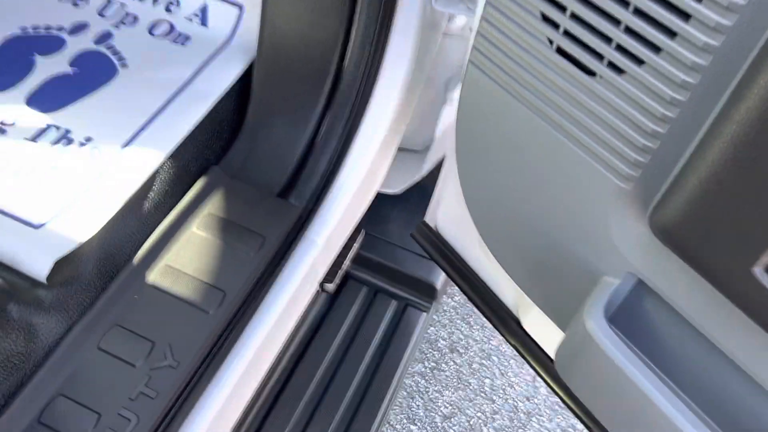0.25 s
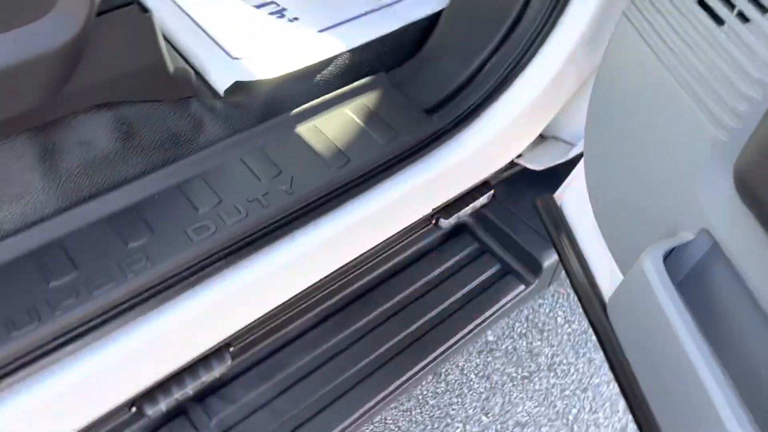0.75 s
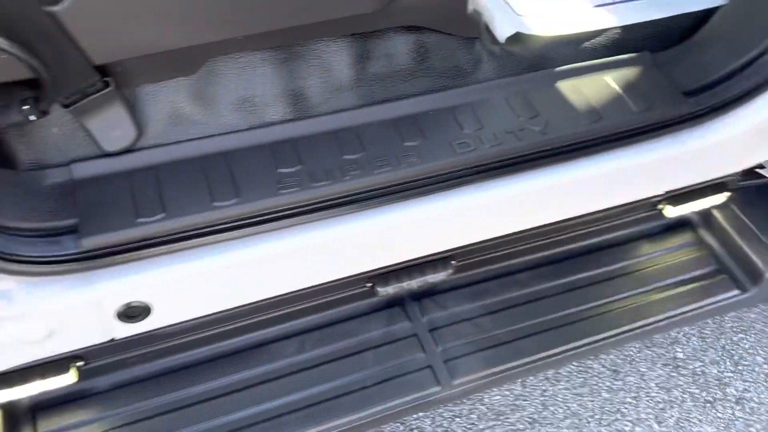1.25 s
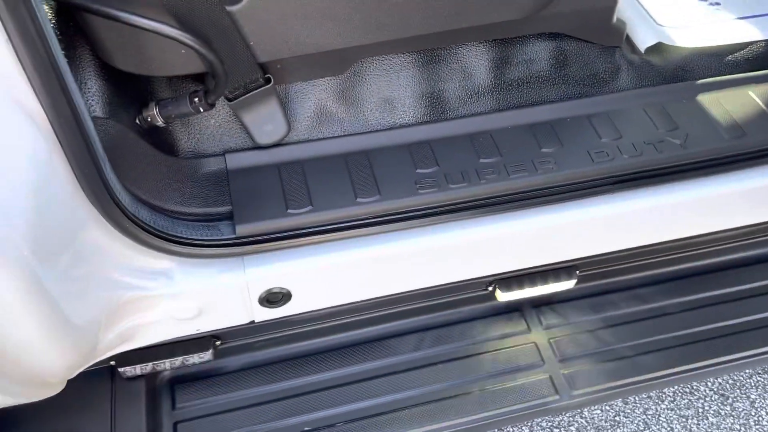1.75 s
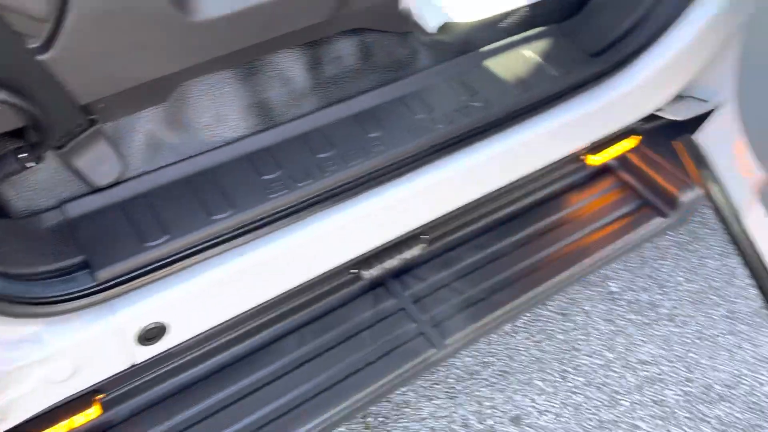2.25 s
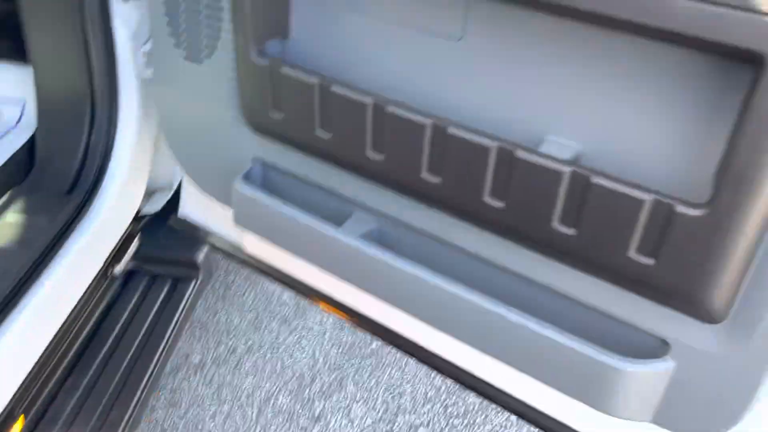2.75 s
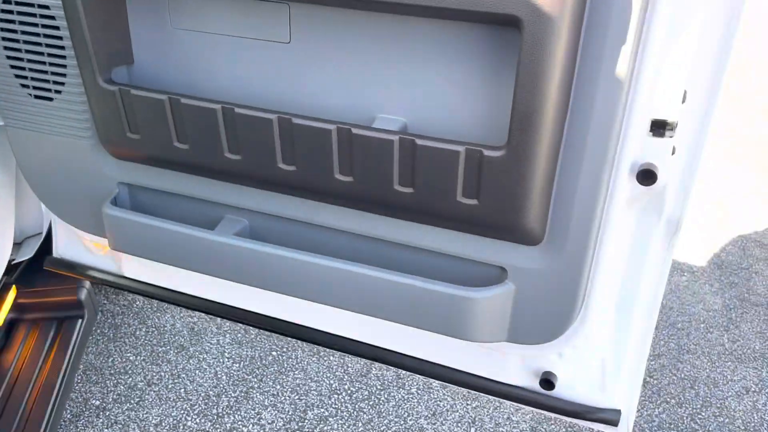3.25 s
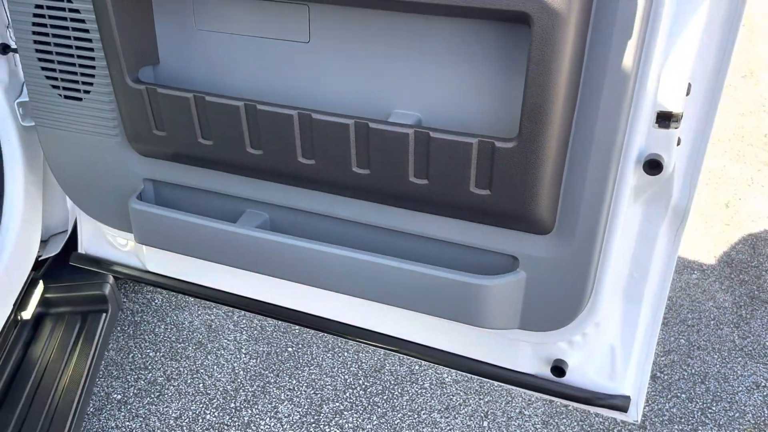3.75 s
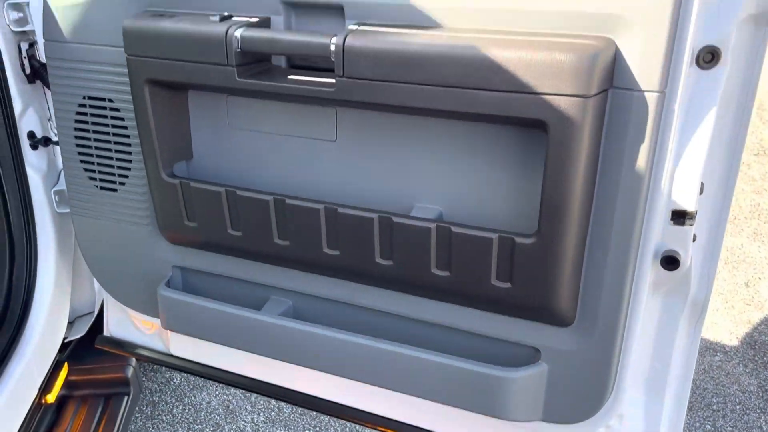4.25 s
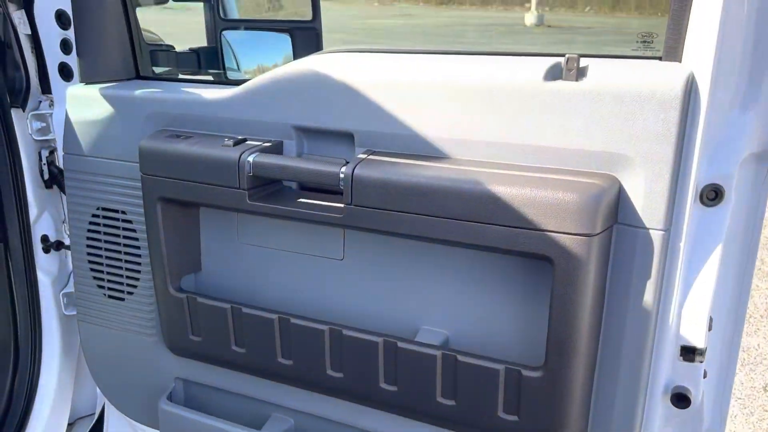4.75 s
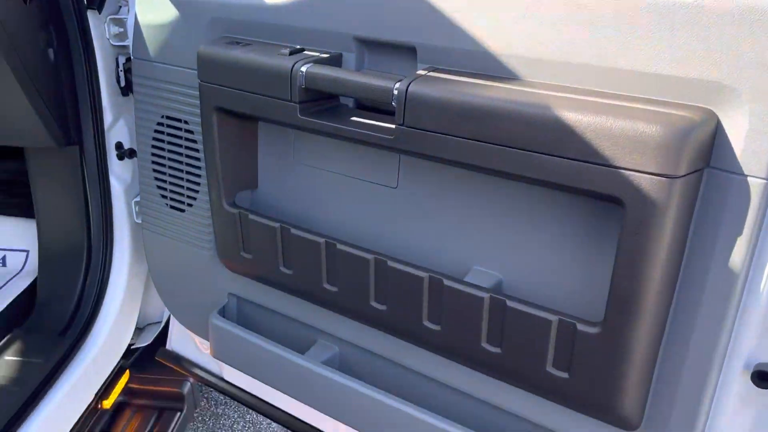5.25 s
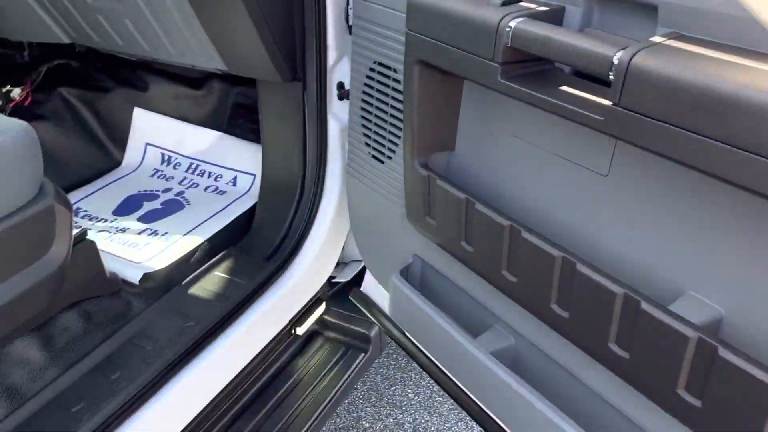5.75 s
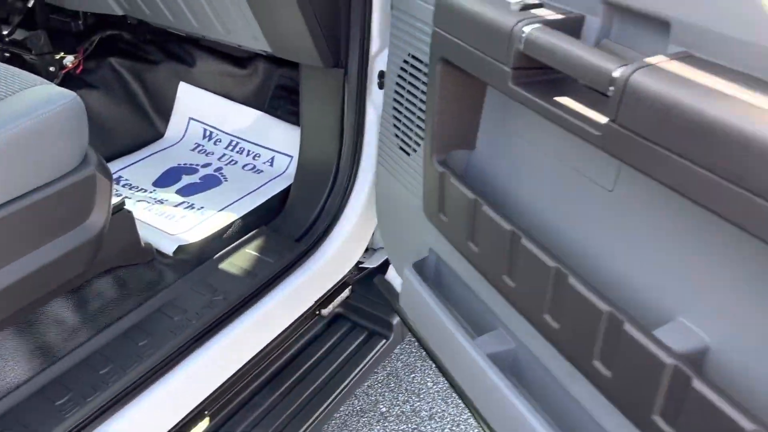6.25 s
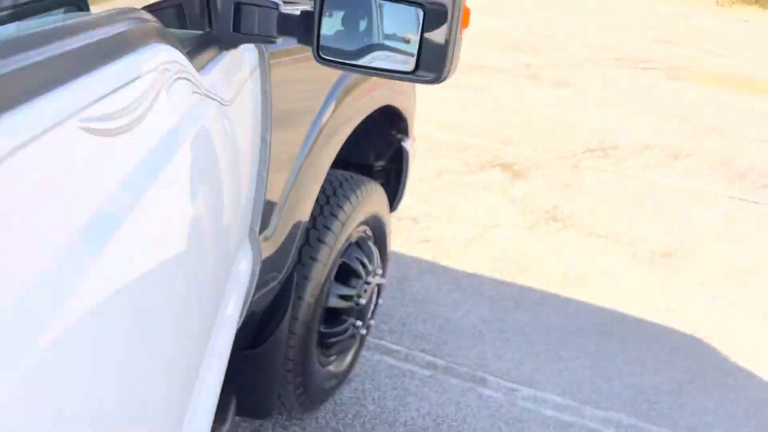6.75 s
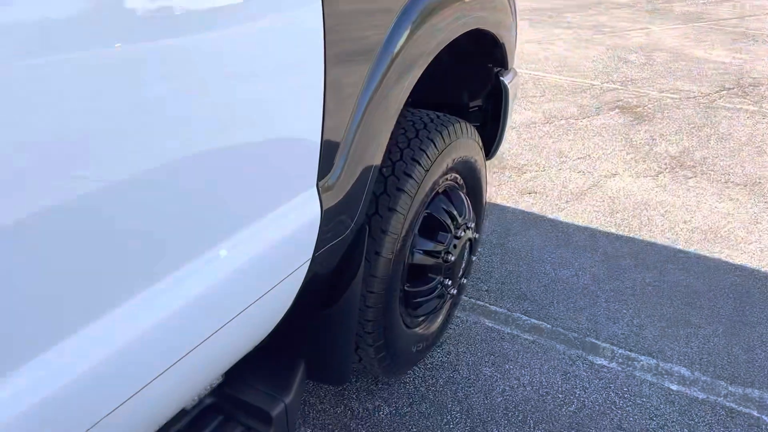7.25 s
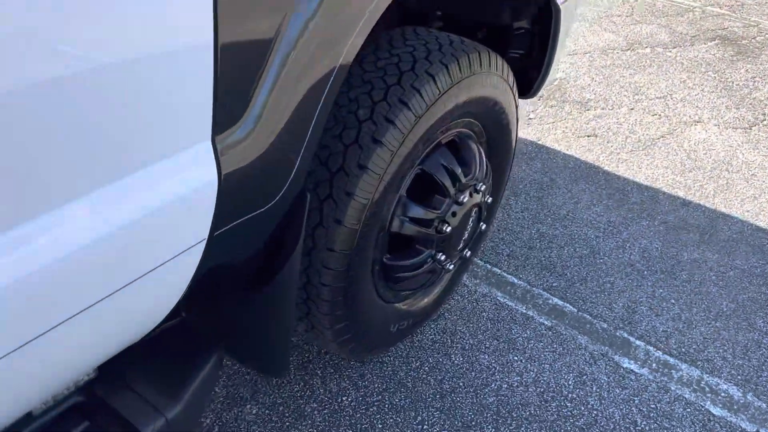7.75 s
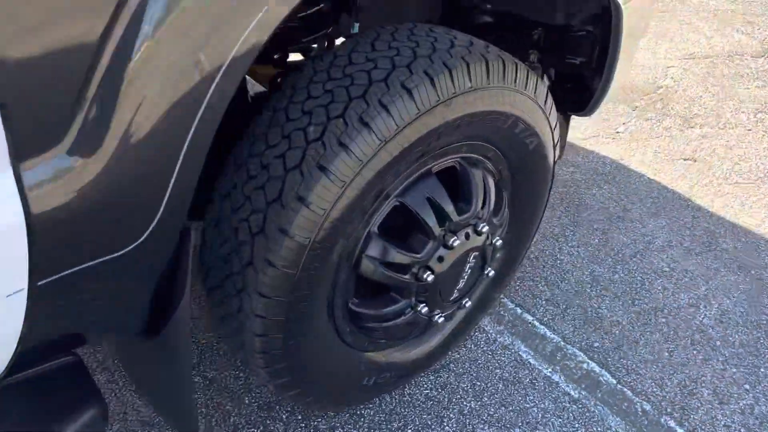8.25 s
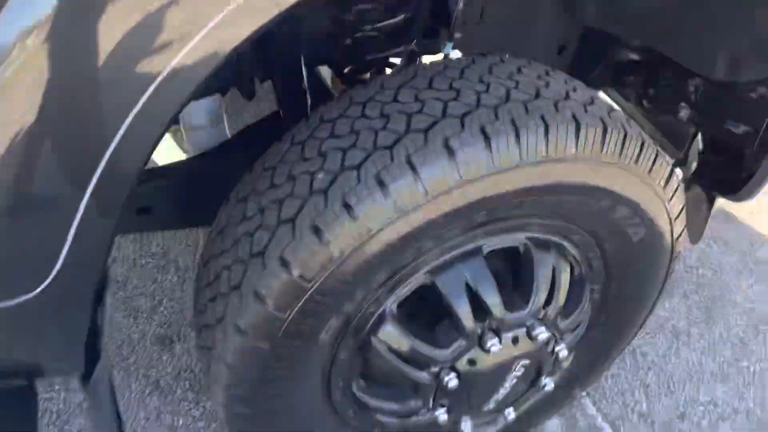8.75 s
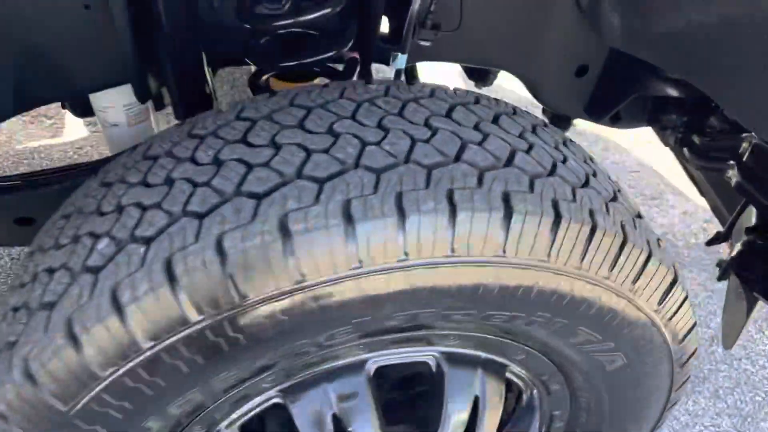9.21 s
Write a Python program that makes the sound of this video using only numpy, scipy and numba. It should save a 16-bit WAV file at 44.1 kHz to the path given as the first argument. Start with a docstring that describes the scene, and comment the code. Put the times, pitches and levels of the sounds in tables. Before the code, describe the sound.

Outdoors, a moving phone microphone picks up the even, ticking rattle of an idling diesel truck, with low wind rumble and the hum of a faraway lorry. After a brief gritty shoe scuff and a faint swish of cloth, gusts thump against the microphone. The cab door slams once, the sharpest sound, and the clatter and a faint gear whine grow as the microphone nears the front wheel.

```python
"""On an open lot a V8 diesel truck idles while a hand-held phone moves from the cab door to the front wheel.
Each firing rattles the engine block, fuel injectors tick, and gears and pumps whine. Wind rumbles and
pops on the microphone. Far off, a lorry hums through its exhaust as it pulls away and changes gear.
A shoe scuffs grit, cloth brushes once, and at 7 s the cab door is swung shut and its panel rings."""
import sys
import numpy as np
from scipy import signal
from scipy.fft import rfft, irfft
from scipy.io import wavfile
from scipy.ndimage import uniform_filter1d
from numba import njit

SR = 44100
rng = np.random.default_rng(int(sys.argv[2]) if len(sys.argv) > 2 else 0)


def file_out(sig):
    """Save sig as 16-bit WAV at sys.argv[1]."""
    # one column per channel
    cols = np.atleast_2d(sig).T
    # limit, then scale
    lim = np.clip(cols, -1, 1)
    pcm = np.round(lim * 32767).astype(np.int16)
    wavfile.write(sys.argv[1], SR, pcm)


N = 418068
T = np.arange(N) / SR
F = np.fft.rfftfreq(N, 1 / SR) + 1e-3
SIDES = np.array([[1], [-1]])  # plus on the left, minus on the right
CYCLE_HZ, CYLINDERS = 5.005, 8  # every cylinder of the truck fires once per cycle


def undb(db):
    """Turn decibels into a number to multiply by."""
    return 10 ** (np.asarray(db) / 20)


def curves(table):
    """Join a table's points in time with straight lines, one curve per column."""
    times, *columns = np.transpose(table)
    return [np.interp(T, times, column) for column in columns]


def bump(time, spread):
    """A smooth hill of height 1 around a moment in seconds."""
    return np.exp(-((T - time) / spread) ** 2)


def wander(rate):
    """A smooth random curve that heads for a new value rate times a second."""
    hold = int(SR / rate)
    steps = np.repeat(rng.standard_normal(N // hold + 1), hold)
    return uniform_filter1d(uniform_filter1d(steps, hold), hold)[:N]


def shape(x, points):
    """Colour a sound with (frequency [Hz], level [dB]) points and set its average power to 1."""
    hz, db = np.transpose(points)
    y = irfft(rfft(x) * undb(np.interp(np.log(F), np.log(hz), db, left=-90)), N)
    return y / np.sqrt(np.mean(y ** 2))


def band(x, hz, width):
    """Keep what lies near hz and set its average power to 1."""
    b, a = signal.iirpeak(hz, hz / width, SR)
    y = signal.lfilter(b, a, signal.lfilter(b, a, x))
    return y / np.sqrt(np.mean(y ** 2))


def split(x, hz):
    """The parts of a sound below and above hz."""
    low = irfft(rfft(x) / (1 + (F / hz) ** 4), N)
    return low, x - low


def add(out, time, x):
    """Mix a short sound in at a time in seconds."""
    start = int(time * SR)
    out[..., start:start + x.shape[-1]] += x


# Tone colour of the engine block: (frequency [Hz], level [dB])
BLOCK_COLOUR = [(300, 6), (600, 3), (1000, -1.5), (1500, -3.5), (1900, -6.5), (2600, -9.5), (3300, -13.5),
                (4500, -17.5), (5500, -22.5), (7500, -21), (9500, -28), (12000, -25.5), (14000, -25.5),
                (16000, -35)]
# Notes the block rings at: (pitch [Hz], width [Hz], boost [dB], extra from the nearest cylinder [dB])
BLOCK_NOTES = [(780, 11, 4.5, -6), (893, 29, 3.5, 3), (1000, 85, 4.5, 6), (1138, 74, 6, 6.5),
               (1275, 27, 6, 2), (1718, 25, 5.5, 13), (2100, 85, 4.5, 8), (2377, 96, 6, 6),
               (2682, 163, 6.5, 4), (2984, 29, 9, 0), (3550, 57, 7.5, 4.5), (3840, 54, 6, 10),
               (4050, 57, 4.5, 11), (4626, 76, 6.5, 7)]
# The cylinder nearest to each note: (cylinder [0-7])
NEAREST_CYLINDER = [1, 6, 7, 7, 1, 5, 6, 3, 2, 5, 6, 0, 0, 6]


def engine_block(knock, firing, closeness_db):
    """Each firing throws a burst of noise through the block and strikes its notes a little differently."""
    depth = 0.59 * undb(2.4 * closeness_db)  # from afar the bursts blur together
    air = rng.standard_normal((2, N))
    burst = split(depth * knock * air, 4400)[0]  # the knock is dull; fan hiss stays smooth above it
    body = shape(air + burst, BLOCK_COLOUR)
    cylinder = (firing - 1) % CYLINDERS
    # single cylinders stand out almost throughout, a little less at the very start
    distinct = np.clip(2 + closeness_db / 8, 0, 1)
    rings = 0
    for (hz, width, db, extra_db), nearest in zip(BLOCK_NOTES, NEAREST_CYLINDER):
        swell_db = 1.6 * wander(2.53)  # notes swell and fade as the phone turns
        luck = rng.standard_normal(firing.max() + 1).clip(-1.5, 1.5)[firing]
        strike_db = 1.1 * (1 + distinct) * luck + extra_db * distinct * (cylinder == nearest)
        strength = undb(swell_db + uniform_filter1d(strike_db, size=200)) * (0.68 + 0.39 * knock)
        note = signal.lfilter(*signal.iirpeak(hz, hz / width, SR), body)
        rings = rings + (undb(db) - 1) * strength * note
    return body + rings


# Each injector's tick; those facing the phone stand out: (level [dB])
INJECTOR_DB = [-11, -9.5, -14, -10, -22, -14.5, -8, -11]


def injectors(firing, phase, level_luck, timing_luck, closeness_db):
    """A fuel injector gives one very high tick per firing, loudest near the wheel."""
    level_db = np.take(INJECTOR_DB, firing - 1, mode="wrap") + 2.3 * level_luck
    pulse = np.exp(-((phase - 0.25 - 0.087 * timing_luck) / 0.56) ** 2)
    colour = [(3000, -38), (8500, 2.5), (11500, -5.5), (13500, 10), (16000, -7)]
    ticks = shape(undb(level_db) * pulse * rng.standard_normal((2, N)), colour)
    return undb(-48.5 + 1.34 * closeness_db) * ticks


# The engine as the phone moves and turns:
# (time [s], level [dB], brightness [dB], boost near 600 Hz [dB], near 780 Hz [dB], near 1 kHz [dB])
ENGINE_PATH = [(0, -44, -15.5, 7.5, -10, 1), (0.9, -41, -8.5, 2, 1, -1), (2, -41, -7.5, 4.5, 5.5, 5.5),
               (3.2, -41, -14, -1.5, -5, -5), (4, -39.5, -14, 0, -8, -3), (5, -41, -13, -0.5, 3.5, 2),
               (5.7, -39, -11.5, -4, -5, 1), (6.4, -40, -10.5, 1, 0.5, 2), (6.8, -39.5, -14, -8, -3, -2.5),
               (7.4, -36.5, -13.5, 1.5, 1.5, 2.5), (8, -35, -17, 2, -1, -4.5),
               (8.5, -34, -14, 0.5, 1.5, 0.5), (9.48, -32.5, -13, 2, 1, 1)]
# Metallic rasp near 2.7 kHz: (time [s], boost [dB])
ENGINE_RASP = [(0, -3), (.8, 3), (1.7, 4), (2.4, 1), (3.2, -2), (5, -2.5), (5.9, 3.5), (6.5, 1.5),
               (7.5, -0.5), (8.5, 0.5), (9.48, -5)]
# Where those three boosts and the rasp lie: (low edge [Hz], high edge [Hz])
BOOST_BANDS = [(480, 690), (690, 870), (870, 1200), (2450, 2900)]
# How hard each cylinder knocks: (level [dB])
KNOCK_DB = [0, 0.7, 0, -1, -0.087, -1.1, -0.23, -0.6]


def idling_engine():
    """Eight cylinders fire in turn; their clatter grows and changes colour as the phone comes closer."""
    level_db, bright_db, *boosts_db = curves(ENGINE_PATH)
    closeness_db = level_db - level_db.max()  # 0 at the nearest spot
    count = (T * CYCLE_HZ - 0.135) * CYLINDERS
    firing, phase = np.floor(count).astype(int) + 1, count % 1  # which firing, and how far through it
    knock_luck, tick_luck, timing_luck = rng.standard_normal((firing.max() + 1, 3))[firing].T
    knock_db = np.take(KNOCK_DB, firing - 1, mode="wrap") + 2.5 * knock_luck.clip(-1.5, 1.5)
    knock = undb(knock_db) * np.sin(np.pi * phase) ** 2
    low, high = split(engine_block(knock, firing, closeness_db), 3770)
    boosts = sum((undb(db) - 1) * signal.lfilter(*signal.butter(2, edges, "band", fs=SR), low)
                 for db, edges in zip(boosts_db + curves(ENGINE_RASP), BOOST_BANDS))
    level = undb(level_db + 1.1 * wander(12))
    treble = undb(bright_db + 13.5 + 0.22 * wander(10))  # a brightness of -13.5 dB is neutral
    clatter = level * (low + boosts + treble * high)
    return clatter + injectors(firing, phase, tick_luck, timing_luck, closeness_db)


# Pitch of each whining tone: (multiple of the firing rate [times])
WHINE_MULTIPLES = [15, 18, 19, 21, 23, 24, 25, 27]
# Each tone is clearest when the phone faces it: (level [dB], loudest at [s], spread [s])
WHINE_SWELLS = [(-49, 7.8, 0.94), (-55.5, 1.6, .8), (-52, 8.4, 0.86), (-57.5, 3.3, 4.7), (-54, 0.38, .8),
                (-54, 0.7, 1.6), (-44, 9.3, 0.9), (-58.5, 2.5, 2.8)]


def gear_whine():
    """Gears and pumps sing thin tones in step with the engine, louder on the left."""
    angle, out = 2 * np.pi * CYCLE_HZ * CYLINDERS * T, 0
    for multiple, (db, time, spread) in zip(WHINE_MULTIPLES, WHINE_SWELLS):
        level = undb(db + 2.5 * wander(3.6)) * bump(time, spread)
        out = out + level * np.sin(multiple * angle + 0.9 * wander(5))
    return out * undb([[3], [-1.5]])


# Wind and idle rumble; the swinging door shelters the phone: (time [s], level [dB], upper bass [dB])
RUMBLE_LEVELS = [(0, -32, -3), (.7, -29, -6), (1.2, -29.5, -1.5), (2.2, -28, -4), (3.4, -29.5, -2.5),
                 (5.0, -27.5, -3.5), (5.15, -21, -9.5), (5.45, -16.5, -4), (5.9, -20, -8.5),
                 (6.1, -31, 4.5), (6.3, -30.5, -10.5), (6.6, -42, -2.5), (6.9, -34, 3.5), (7.35, -25, -3),
                 (7.7, -31, 2.5), (8.4, -26, -1.5), (8.7, -20.5, -4.5), (9.48, -18.5, -8)]
# Tone colour of the rumble: (frequency [Hz], level [dB])
RUMBLE_COLOUR = [(15, -69), (25, -35.5), (49, -1.5), (102, -2.5), (172, -6), (193, -11.5), (330, -14.5),
                 (468, -28), (800, -39.5), (1040, -74), (1760, -120)]
# Single gusts: (time [s], rise [dB], spread [s])
WIND_GUSTS = [(1.72, 4.5, 0.21), (3.04, 6.5, 0.28), (3.68, 4.5, 0.059), (4.0, 5, 0.05), (5.24, 7, 0.037),
              (5.44, -1, 0.032), (5.6, 3, 0.032), (5.91, 3, 0.013), (6.36, 9, 0.048), (7.68, 8.5, 0.2),
              (8.14, 8.5, 0.1), (8.88, 2, 0.23)]


def wind_rumble():
    """Wind on the microphone makes low noise whose bands each flutter; gusts swell the deepest part."""
    level_db, upper_db = curves(RUMBLE_LEVELS)
    gust_db = sum(db * bump(time, spread) for time, db, spread in WIND_GUSTS)
    gust_db = gust_db + 1.45 * wander(11)  # small gusts in between
    level_db = level_db + gust_db
    tilt_db = upper_db + 7.5 - gust_db  # an upper bass of -7.5 dB is neutral
    spectrum, out = rfft(shape(rng.standard_normal((2, N)), RUMBLE_COLOUR)), 0
    for hz in 25 * 2 ** (np.arange(16) / 3):  # three bands per octave
        noise = irfft(spectrum * np.clip(1 - np.abs(3 * np.log2(F / hz)), 0, 1), N)
        tilt_share = np.clip(np.log2(hz / 110) / 1.05, 0, 1)
        out = out + noise * undb(tilt_share * tilt_db + 1.7 * wander(8))
    buffet_db = np.clip(level_db + 22.5, 0, 10) * 0.24 * wander(45)  # strong gusts come in lumps
    return out * undb(level_db + buffet_db)


# Speed of the lorry's engine: (time [s], cycle rate [Hz])
LORRY_SPEED = [(0, 21.85), (.65, 22.3), (1.85, 23.7), (2.55, 24.5), (2.95, 24.75), (3.25, 20.8),
               (6.6, 20.45), (8.3, 20.48), (8.75, 19.3), (9.1, 18.85), (9.48, 18.8)]
# Pitch of each of its tones: (multiple of the cycle rate [times])
LORRY_MULTIPLES = [3, 5, 8, 10, 11, 13, 16, 19, 21, 23, 24]
# Strength of each tone: (level [dB])
LORRY_TONE_DB = [0.5, 3, -2, -3.5, -6, -6.5, -2.5, -11.5, -19.5, -10.5, -13]
# Tone colour of the exhaust pipe and the path from it: (frequency [Hz], level [dB])
EXHAUST_COLOUR = [(55, 3.5), (62, -4), (75, -16), (105, 1.5), (125, 2.5), (190, -7.5), (230, -0.5),
                  (270, -0.5), (300, -2), (330, -2.5), (350, -23), (366, 4.5), (385, 5), (400, -7),
                  (432, 5), (520, -27.5)]
# The lorry as it drives off: (time [s], level [dB], firing hum boost [dB], boost an octave up [dB],
# stereo width [dB], boost of the high odd multiples [dB])
LORRY_MIX = [(0, -39.5, 16, -11, -14, 5), (.25, -40, 25, -10, -15, 4.5), (.8, -41, 27.5, 0, -10.5, 1),
             (1.25, -43.5, 23.5, 3, -2.5, -4), (1.85, -40, 12, -0.5, -3, -1.5),
             (2.6, -34.5, 5.5, -9.5, -12.5, .3), (3.1, -35, 10, -3.5, -22, -2.5),
             (4.6, -35, -4, 2, -5.5, 2), (5.8, -32, 5, 6.5, -16, 1.5), (6.6, -46.5, -6, 8, -16, 6),
             (7.5, -32.5, -6, 8, -8.5, 0.5), (8.3, -35.5, -2, 4, -17, 2),
             (9.1, -30.5, 13.5, -15, -26, -3.5), (9.48, -33, 7, -8, -23, 2)]


def distant_lorry():
    """Engine tones slide through the exhaust's resonances and waver with the air; echoes widen them."""
    hz, = curves(LORRY_SPEED)
    level_db, hum_db, octave_db, width_db, odd_db = curves(LORRY_MIX)
    angle, out = 2 * np.pi * np.cumsum(hz) / SR, 0
    for multiple, db in zip(LORRY_MULTIPLES, LORRY_TONE_DB):
        phase = multiple * angle + 0.15 * wander(9)
        echo = undb(width_db) * np.sin(phase + 2.37) * SIDES  # leans to the right
        pipe_db = np.interp(multiple * hz, *np.transpose(EXHAUST_COLOUR))
        boost_db = hum_db * (multiple == 8) + octave_db * (multiple == 16)  # eight firings per cycle
        boost_db += odd_db * (multiple > 11 and multiple % 2)
        out = out + undb(db + pipe_db + boost_db + 0.8 * wander(5.3)) * (np.sin(phase) + echo)
    throttle = 1 - np.exp(-((T - 3.1) / 0.077) ** 4)  # closes for the gear change
    return np.sqrt(2) * throttle * undb(level_db) * out


# Grit under the shoe and clicks of the latch:
# (time [s], level [dB], pitch [Hz], width [Hz], swell [s], left minus right [dB])
SCRAPES = [(.812, -34, 2000, 1500, .002, 0), (1.026, -31.5, 1067, 350, 0.0088, 20),
           (1.03, -32, 2100, 700, 0.0094, -2), (1.035, -23, 1040, 300, .003, 7),
           (1.0435, -22.5, 1000, 890, 0.001, -3), (1.047, -25.5, 840, 350, 0.0068, 9.5),
           (1.059, -27, 900, 900, 0.003, 3), (1.072, -32, 750, 400, 0.0054, 8),
           (1.088, -31, 780, 400, .005, 8), (1.104, -29, 945, 300, 0.0074, 14),
           (1.113, -30.5, 1130, 400, 0.0032, 5), (1.127, -33, 1660, 694, 0.0067, -14),
           (1.134, -34, 930, 300, .004, 9), (1.181, -31.5, 2010, 1800, 0.0045, 4),
           (1.194, -31.5, 2680, 2200, 0.0068, -6), (1.206, -35, 2400, 1850, 0.004, -3),
           (1.259, -25, 2300, 1500, 0.0034, 4), (1.272, -23.5, 2480, 1490, 0.0064, 1),
           (1.294, -29, 2600, 1200, 0.0041, 0), (1.328, -32, 2500, 1800, 0.0017, -11),
           (1.365, -32.5, 2870, 1500, 0.0063, 1), (2.762, -34, 950, 900, .003, 7),
           (2.99, -36, 1800, 350, 0.0033, 0), (6.875, -28.5, 1690, 330, 0.0042, -13),
           (7.001, -24, 1700, 230, 0.00204, -18), (7.0042, -31, 1800, 500, 0.00143, -8),
           (7.119, -36, 2750, 700, 0.0042, -2), (7.673, -27, 896, 350, 0.00305, -9),
           (7.674, -27, 1680, 400, 0.002, -11)]


def grit_and_latch():
    """Short scrapes around one pitch: narrow ones knock hollowly, wide and slow ones have a crisp top."""
    out, t = np.zeros((2, N)), T[:SR // 20]
    hollow_hz, gritty_hz, raspy_s = 200, 700, 0.005
    for time, db, hz, width, swell, pan_db in SCRAPES:
        middle, side, grit_noise, top_noise = rng.standard_normal((4, len(t)))
        scrape = band(middle + 0.63 * side * SIDES, hz, 0.91 * width)
        scrape *= 0.58 * min(width / gritty_hz + 0.34, 1)
        ring = hollow_hz / width * np.sin(2 * np.pi * hz * t)
        grit = min(280 / hz, 0.4) * min(width / hollow_hz, 1) ** 3 * band(grit_noise, 1260, 1000)
        crispness = min(width / gritty_hz, 1) * min(swell / raspy_s, 1) ** 2
        top = undb(-23) * crispness * band(top_noise, 8200, 9000)
        envelope = (t / swell * np.exp(1 - t / swell)) ** 2
        add(out, time - swell, undb(db + SIDES * pan_db / 2) * envelope * (scrape + ring + grit + top))
    return out


# Slaps of wind: (time [s], level [dB], pitch [Hz])
WIND_SLAPS = [(1.012, -18.5, 413), (1.051, -22, 480), (1.366, -13, 193), (3.966, -15.5, 95),
              (4.01, -10.5, 100), (4.552, -12, 85.5), (5.245, -10, 150), (5.397, -6.5, 170),
              (5.432, 0.5, 199), (5.478, -8, 184), (5.5488, -4.5, 338), (5.786, -10, 347),
              (5.875, -13, 219), (5.926, -10.5, 298), (5.96, -11, 326), (6.039, -15.5, 484),
              (6.19, -12, 390), (6.223, -19.5, 433), (6.344, -14.5, 397), (6.402, -18, 326),
              (7.621, -12, 240), (8.476, -4, 154)]


def wind_pops():
    """A gust slaps the thin skin inside the microphone, which swings out in a cycle or two."""
    out, t = np.zeros(N), T[:SR // 20]
    for time, db, hz in WIND_SLAPS:
        cycles = t * hz
        envelope = (1 - np.exp(-cycles / 0.19)) ** 2 * np.exp(-cycles / 1.52)
        add(out, time, undb(db) * envelope * np.sin(2 * np.pi * cycles + 0.56))
    return out


def cloth_brush():
    """Cloth rubs once and makes a soft swish of noise."""
    hiss = shape(rng.standard_normal((2, N)), [(800, 9), (2000, -3), (7000, -9), (14000, -15)])
    return undb(-44) * bump(time=2.955, spread=0.045) * hiss


# A faint swell of noise just before the slam, then the door's blows: (time [s], panel level [dB],
# crack level [dB], time for the crack to fade 60 dB [s], share kept per octave below 600 Hz [0-1])
DOOR_SOUNDS = [(7.022, -24, -29, 0.071, 0.9), (7.0286, -15.5, -20, 0.041, 0.9),
               (7.0342, -9, -8, 0.017, 0.63), (7.039, -12, -28, 0.078, 0.9),
               (7.059, -16.5, -24.5, 0.065, 0.94), (7.067, -9, -40, .03, 0.68), (7.079, -15, -43, .03, 0.7),
               (7.092, -16.5, -51, .03, 0.8)]
# Notes of the door panel: (pitch [Hz], level [dB], time to fade 60 dB [s])
PANEL_NOTES = [(72, 10, 0.2), (133, 8.5, 0.13), (187, 3, 0.099), (252, 17.5, 0.022), (296, 2.5, 0.1),
               (326, 15, 0.023), (400, 0, 0.054), (463, -3, 0.02), (597, -27, 0.018), (1000, 0, 0.018),
               (1350, 14.5, 0.0085), (2600, -8, 0.013)]


def cab_door():
    """After a faint swell of noise, the door's blows ring the panel, shake the trim and crack brightly."""
    panel, crack, t = np.zeros((2, N)), np.zeros((2, N)), T[:SR // 2]
    for time, panel_db, crack_db, crack_fade, low_share in DOOR_SOUNDS:
        phases, ring = rng.uniform(0, 1, (len(PANEL_NOTES), 2, 1)), 0
        for (hz, db, fade), phase in zip(PANEL_NOTES, phases):
            high_db = (hz > 600) * (crack_db - panel_db + 4.5)  # high notes follow the crack's level
            level = undb(db + high_db) * low_share ** np.log2(600 / hz).clip(0)
            ring = ring + level * np.sin(2 * np.pi * hz * t + phase) * 1000 ** (-t / fade)
        trim = 0.72 * band(rng.standard_normal((2, len(t))), 410, 440) * 1000 ** (-t / 0.05)
        add(panel, time, undb(panel_db) * (1 - np.exp(-t / 0.0073)) * (ring + trim))
        snap = t / (t + 0.00025) * 1000 ** (-t / crack_fade)
        add(crack, time, undb(crack_db) * snap * rng.standard_normal((2, len(t))))
    shut_s, thump_hz = 7.0385, 420  # the door meets its frame
    thump = undb(-2.5) * np.sin(2 * np.pi * thump_hz * (T - shut_s)) * bump(shut_s, 0.6 / thump_hz)
    return thump + panel, signal.lfilter(*signal.butter(1, (1000, 5500), "band", fs=SR), crack)


# How the phone's two microphones compare: (frequency [Hz], likeness [0-1], left minus right [dB], right's head
# start [radians])
MICROPHONES = [(100, 0.96, 0.5, 0.1), (350, 0.82, 1.5, -0.45), (720, 0, 5.5, 0.46), (1130, 0, 5, -0.043),
               (1590, 0, 1.5, -0.59), (2500, 0.56, 2, 0.74), (4500, 0.67, -2, 1), (6400, 0.44, 0, -0.4),
               (7750, 1, -0.5, 0.1)]


def microphone_pair(x):
    """Blend two unrelated sounds into a left and a right that are partly alike."""
    hz, like, pan_db, lead = np.transpose(MICROPHONES)
    like = np.clip(like, 0, 0.999)
    like, pan_db, lead = (np.interp(np.log(F), np.log(hz), column) for column in (like, pan_db, lead))
    lead = lead - 2 * np.pi * np.maximum(F - 7000, 0) / 4800  # high treble is 1/4800 s late on the right
    left, other = rfft(x)
    right = like * np.exp(1j * lead) * left + np.sqrt(1 - like ** 2) * other
    return irfft(np.array([left * undb(pan_db / 2), right * undb(-pan_db / 2)]), N)


def scene():
    """Engine, rumble, cloth and door crack blend across both microphones; the rest keep their direction."""
    thud, crack = cab_door()
    pair = microphone_pair(idling_engine() + wind_rumble() + cloth_brush() + crack)
    # once the phone faces the engine, from 7.1 s, the stereo narrows between 300 and 4000 Hz
    side_above_bass = split((pair[0] - pair[1]) / 2, 300)[1]
    side_middle = split(side_above_bass, 4000)[0]
    narrowing = 0.33 * np.clip((T - 7.1) * 2, 0, 1)
    pair = pair - narrowing * side_middle * SIDES
    return pair + gear_whine() + distant_lorry() + grit_and_latch() + wind_pops() + thud


@njit
def follow(x, rise_s, fall_s):
    """Track a level, with one speed for rising and another for falling."""
    out, level = np.empty(len(x)), 0.
    for i in range(len(x)):
        level += (x[i] - level) / (SR * (rise_s if x[i] > level else fall_s))
        out[i] = level
    return out


def record(dry):
    """The phone slowly turns down after loud sound above 500 Hz, rounds off peaks and cuts the very top."""
    limit_db, lag_s, top_hz = -21.5, 0.05, 15750
    heard = np.abs(split(dry, 500)[1]).max(axis=0)
    excess = np.maximum(follow(heard, rise_s=0.001, fall_s=0.15) / undb(limit_db), 1)
    cut, step = 1 - excess ** -1.8, 1 / (lag_s * SR)
    for _ in range(2):  # smoothing makes the cut come late
        cut = signal.lfilter([step], [1, step - 1], cut)
    rounded = np.tanh(0.7 * dry * (1 - cut)) / 0.7
    return signal.sosfilt(signal.ellip(12, 0.2, 90, top_hz, fs=SR, output="sos"), rounded)


dry = scene()
out = record(dry)
file_out(out)
```